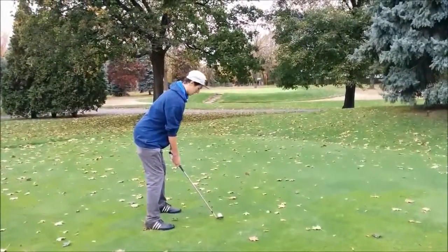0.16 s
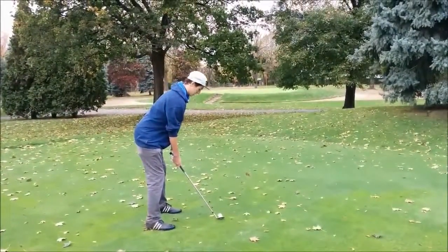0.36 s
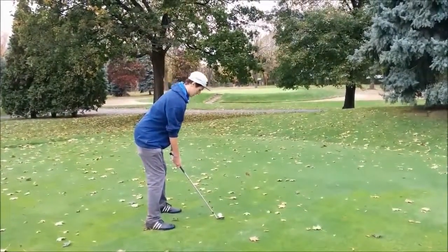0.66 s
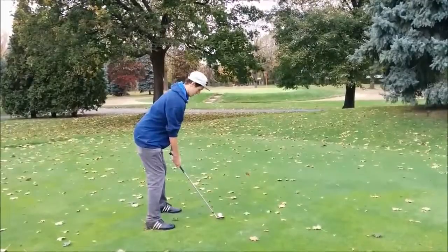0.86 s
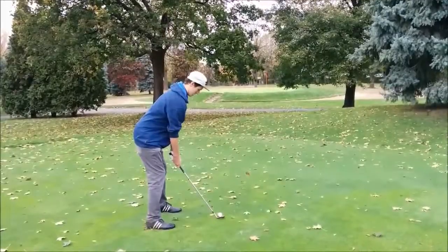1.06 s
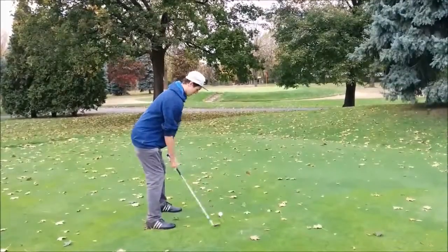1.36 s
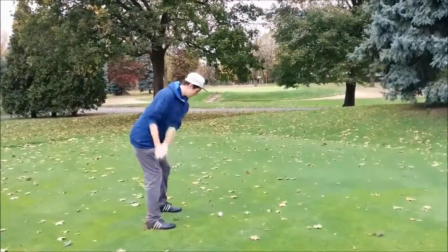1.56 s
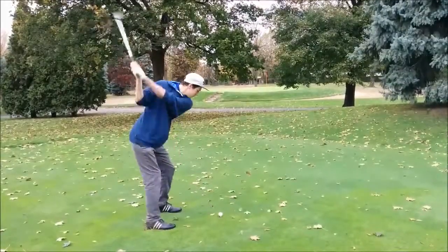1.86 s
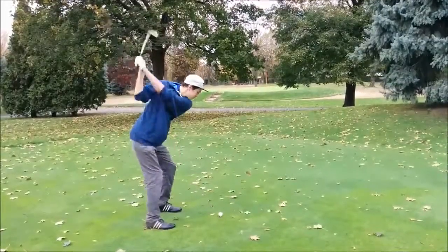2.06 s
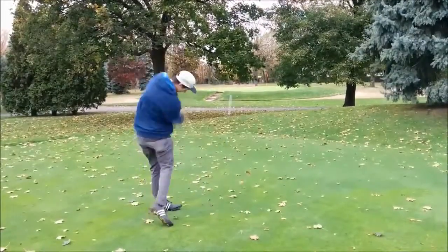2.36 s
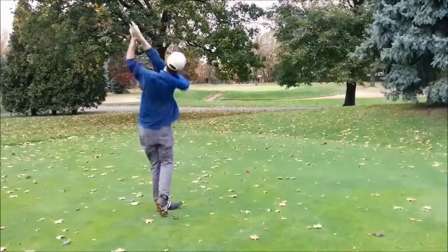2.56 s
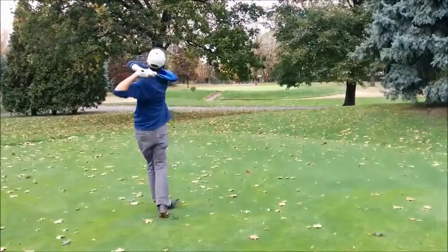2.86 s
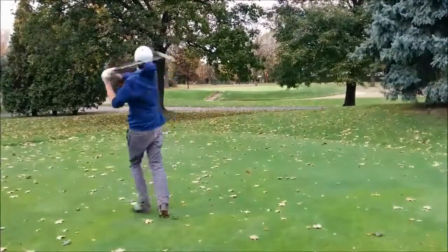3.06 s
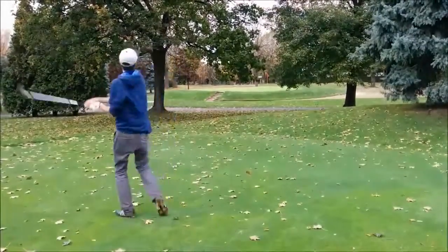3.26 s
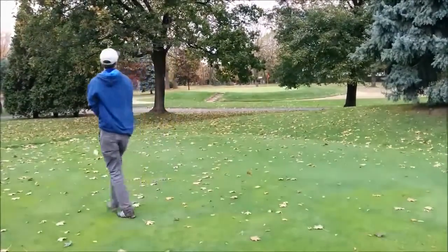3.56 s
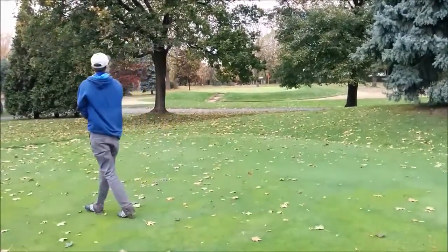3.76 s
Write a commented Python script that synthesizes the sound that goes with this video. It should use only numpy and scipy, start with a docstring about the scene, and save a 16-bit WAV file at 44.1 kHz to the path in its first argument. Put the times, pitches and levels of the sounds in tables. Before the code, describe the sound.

A golf shot cracks out in gusty wind. From the start, uneven gusts rumble and thump on the microphone, with a small tick near 1.1 seconds. At about 2.6 seconds a club swishes briefly and hits the ball with a sharp, bright crack, then swishes on. Turf and leaves patter faintly until 3 seconds, a shoe scuffs lightly around 3.2 seconds, and the gusts ease towards 4 seconds.

```python
"""Iron shot in gusty wind

A golfer plays off leaf-strewn grass a few metres from a phone. The club's turbulent wake swishes, and
the impact cracks and rings the modes of ball and club head. The club swishes on, leaves and turf patter
back and a shoe scuffs. Throughout, gusts rumble on the microphone port and single eddies thump it."""
import sys
import numpy as np
from scipy import signal
from scipy.fft import rfft, irfft
from scipy.io import wavfile
from scipy.ndimage import uniform_filter1d

SR = 44100
rng = np.random.default_rng(int(sys.argv[2]) if len(sys.argv) > 2 else 0)


def dump(signal):
    """Clip the signal to [-1, 1] and save it as 16-bit WAV at the path in sys.argv[1]."""
    limited = np.clip(np.atleast_2d(signal).T, -1, 1)
    pcm = np.round(limited * 32767).astype(np.int16)
    wavfile.write(sys.argv[1], SR, pcm)


N = 171990


def undb(db):
    """Amplitude ratio of a level in decibels."""
    return np.exp(np.asarray(db) * np.log(10) / 20)


def unit(x):
    """Normalisation to rms 1."""
    return x / np.sqrt(np.mean(x ** 2))


def clock(size):
    """Sample times in seconds."""
    return np.arange(size) / SR


def add(out, start_s, sound):
    """Superposition: a short sound sums into the mix."""
    i = int(round(start_s * SR))
    lo, hi = max(i, 0), min(i + len(sound), N)
    if hi > lo:
        out[lo:hi] += sound[lo - i:hi - i]


def noise(spectrum, size=N):
    """Spectral shaping: white noise filtered to a density curve, at rms 1."""
    hz, db = np.array(spectrum, float).T
    bins_hz = np.maximum(np.fft.rfftfreq(size, 1 / SR), 1)
    gain = undb(np.interp(np.log(bins_hz), np.log(hz), db))
    return unit(irfft(rfft(rng.standard_normal(size)) * gain, size))


def smooth(x, width):
    """Low-pass filtering by two moving averages."""
    return uniform_filter1d(uniform_filter1d(x, width), width)


def wander(rate_hz):
    """Random modulation: smoothed noise of rms 1."""
    return unit(smooth(rng.standard_normal(N), max(int(SR / rate_hz), 2)))


def steady(x, window_s):
    """Division by the running rms evens out slow swells."""
    return x / np.sqrt(smooth(x ** 2, int(window_s * SR)) + 1e-9)


def decay(age, t60_s, hold_s=0):
    """Exponential damping: after the hold, 60 dB is lost every t60_s."""
    return np.exp(-np.log(1000) * np.maximum(age - hold_s, 0) / t60_s)


def bursts(rows, spectrum, rise_s, t60_s):
    """Noise transients: a fast rise, then exponential decay."""
    out, age = np.zeros(N), clock(4096)
    attack = np.sin(np.pi / 2 * np.minimum(age / rise_s, 1)) ** 2
    envelope = attack * decay(age, t60_s, hold_s=rise_s)
    for start_s, level_db in rows:
        add(out, start_s, undb(level_db) * steady(noise(spectrum, len(age)), .002) * envelope)
    return out


# Distant outdoor air: frequency_hz, density_db
AIR_SPECTRUM = [(40, -6), (160, 6), (550, -14), (850, -6), (2000, -28), (4500, -38), (16000, -43)]
def outdoor_air(level_db=-55.5, drift_db=1.2):
    """Ambient noise floor: a low wash that drifts in level."""
    return undb(level_db) * noise(AIR_SPECTRUM) * undb(drift_db * wander(8))


# Gusts at the microphone port: start_s, length_s, level_db
PORT_GUSTS = [(.025, .095, -29), (.125, .125, -24), (.32, .04, -27), (.408, .055, -16), (.47, .06, -29),
              (.535, .032, -16), (.64, .07, -27), (.775, .05, -36), (.918, .04, -22), (.96, .115, -17),
              (1.132, .033, -21), (1.247, .025, -25), (1.305, .11, -20), (1.42, .042, -17),
              (1.55, .18, -32), (1.632, .025, -23), (1.745, .145, -21), (1.895, .09, -18), (2., .09, -26),
              (2.095, .062, -21), (2.318, .025, -30), (2.392, .07, -28), (2.492, .11, -22),
              (2.61, .08, -28), (2.695, .145, -20), (2.85, .15, -29), (3.147, .15, -22), (3.305, .195, -20),
              (3.615, .04, -23), (3.782, .035, -29), (3.882, .03, -28)]
def gust_pressure(attack_s=.008, release_s=.016):
    """Incoherent addition: gusts swell, hold and die, summing in power to one pressure envelope."""
    power, age = np.zeros(N), clock(16384)
    for start_s, length_s, level_db in PORT_GUSTS:
        envelope = np.minimum(age / attack_s, 1) * np.exp(-np.maximum(age - length_s, 0) / release_s)
        add(power, start_s - attack_s / 2, (undb(level_db) * envelope) ** 2)
    return np.sqrt(power)


# Low rumble, upper rumble and hiss of the wind: frequency_hz, density_db
LOW_RUMBLE = [(30, -40), (58, 0), (160, 0), (280, -7), (450, -24), (4000, -105)]
UPPER_RUMBLE = [(120, -16), (260, 0), (400, -4), (680, -21), (1150, -32), (4000, -95)]
WIND_HISS = [(1000, 5), (1500, 1), (1900, -7), (3800, -10), (4600, -22), (7500, -15), (16000, -31)]
def wind_noise(gust, flutter_hz=45):
    """Turbulent pressure: a fluttering rumble brightens with gust strength over a faint, slower hiss."""
    strength = gust / undb(-20)
    low = undb(-1) * gust * steady(noise(LOW_RUMBLE), .03)
    upper = undb(-28) * strength ** 1.3 * noise(UPPER_RUMBLE)
    upper *= unit(undb(3 * wander(flutter_hz)))
    swell = uniform_filter1d(strength, int(.05 * SR))
    hiss = undb(-55.5) * swell ** .62 * noise(WIND_HISS)
    flutter = unit(undb(3.6 * wander(flutter_hz)))
    return (low + upper) * flutter + hiss


def pulse(u):
    """A smooth pressure pulse, u in half widths."""
    return (1 + u ** 2 / 3 + u ** 4 / 22) ** -2.75


# Single eddies hitting the port: time_s, level_db, half_width_ms
PORT_EDDIES = [(.1289, -2, .65), (.1795, 1, .56), (.2344, -9, .8), (.4214, -2, .72), (.4298, -4, 1.2),
               (.4455, -5, .9), (.4668, .8, .6), (.4111, -8, .8), (.5377, -7, 1.1), (.5435, -4, .62),
               (.556, -3, .55), (.5623, -6, .6), (.6577, -9, .6), (.6964, -13, .65), (.9605, -9, .55),
               (.9793, -3, 1.2), (1.0073, -5, .7), (1.0602, -7, 1.1), (1.1393, -7, .65), (1.3334, -8, 1.2),
               (1.4487, -3, .75), (1.4621, -.3, .55), (1.8017, -5, .68), (1.8899, -9, .7),
               (1.9035, -1.5, .75), (1.9405, -8, .9), (1.9529, -4, .7), (1.9646, -1.5, .58),
               (1.98, -7, 1.1), (2.3271, -5, .62), (2.5546, -2, .6), (2.7906, -6, .65), (2.8341, -8, .9),
               (2.9061, -4, .75), (2.9543, -3.5, .7), (3.152, -9, .6), (3.2349, -11, .75),
               (3.3117, -7, 1.1), (3.3218, -2, 1.), (3.4928, -7, 1.1), (3.6235, -7, .7), (3.635, -9, .7)]
def eddies(gust, sputter_per_s=60, lead_s=.01):
    """Vortex pressure: each passing eddy pushes slightly, sucks at the port, then rebounds."""
    rows = [(time_s, undb(db), width_ms) for time_s, db, width_ms in PORT_EDDIES]
    # Small eddies sputter through the gusts, narrower in strong wind.
    for k, (jitter, loud, wide) in enumerate(rng.standard_normal((N // 200, 3))):
        time_s = (k + jitter / 2) / sputter_per_s
        if 0 < time_s < (N - 1) / SR:
            pressure = gust[int(time_s * SR)] + 1e-6
            width_ms = 1.05 * (pressure / undb(-20)) ** -.25 * np.exp(.3 * wide)
            rows.append((time_s, pressure * undb(3 + 3 * loud), width_ms))
    out, offset_ms = np.zeros(N), 1000 * (clock(1024) - lead_s)
    for time_s, amplitude, width_ms in rows:
        u = offset_ms / width_ms
        thump = .18 * pulse(u + 2.1) - pulse(u) + .42 * pulse(u - 2.1)
        add(out, time_s - lead_s, amplitude * thump)
    return out


# Hard eddies breaking: start_s, level_db
EDDY_SNAPS = [(.229, -18), (.418, -19), (.554, -24), (1.638, -28), (1.754, -18), (1.927, -24), (2.786, -30),
              (3.149, -27)]
# Their spectrum: frequency_hz, density_db
SNAP_SPECTRUM = [(820, 0), (1300, -14), (2000, -36), (16000, -90)]
def eddy_snaps():
    """Vortex breakdown: hard eddies snap in dull bursts."""
    return bursts(EDDY_SNAPS, SNAP_SPECTRUM, rise_s=.002, t60_s=.04)


# A sharp tick: frequency_hz, density_db
TICK_SPECTRUM = [(2000, -22), (4900, 0), (10000, -3), (16000, -13)]
def tick(start_s=1.0674, level_db=-24.5):
    """A broadband transient, heard as one bright tick."""
    return bursts([(start_s, level_db)], TICK_SPECTRUM, rise_s=.0002, t60_s=.008)


def dropout(x, start_s=1.3229, length_s=.006, fade_s=.002, click_db=-24):
    """Gating: the sound cuts out for an instant, with a dry click at the leading edge."""
    t = clock(N) - start_s
    click = undb(click_db) * np.exp(-np.abs(t) / .001) * (t < 0)
    gate = np.clip(np.maximum(-t, t - length_s) / fade_s, 0, 1)
    return x * np.sin(np.pi / 2 * gate) ** 2 + click


# Downswing (also the trees' echo) and follow-through: frequency_hz, density_db
SWISH_SPECTRUM = [(400, -20), (900, 0), (2400, -2), (3400, -15), (5700, -15), (7000, -29), (16000, -42)]
TURF_SPECTRUM = [(500, -20), (1000, -4), (1800, 0), (3600, -10), (4800, -5), (6000, -21), (16000, -48)]
def swish(spectrum, peak_s, level_db, rise_s, fall_s):
    """Flow noise: the rush of air and grass past the club swells and falls."""
    out, t = np.zeros(N), clock(32768)
    middle = t[-1] / 2
    u = (t - middle) / np.where(t < middle, rise_s, fall_s)
    envelope = np.exp(2 - 2 * np.sqrt(1 + u ** 2))
    add(out, peak_s - middle, undb(level_db) * envelope * noise(spectrum, len(t)))
    return out


# Modes of ball and club head: pitch_hz, level_db, t60_s
IMPACT_MODES = [(945, -11, .021), (1215, -9, .022), (1640, -17, .013), (1950, -12, .012), (2326, -15, .016),
                (2650, -16, .016), (5700, -12, .01), (6050, -15, .009), (7834, -21, .016),
                (9150, -25, .016)]
# Contact crack and grass spray: frequency_hz, density_db
CRACK_SPECTRUM = [(600, -15), (1000, 0), (2400, -1), (5000, -15), (5800, 2), (7000, -15), (9000, -14),
                  (16000, -29)]
SPRAY_SPECTRUM = [(1000, 0), (10000, -11), (16000, -18)]
def strike(start_s=2.6236, zing_hz=3980, zing_hz_per_s=30000):
    """Impact excitation: a crack rings damped modes; grass sprays and the trees echo faintly."""
    out, age = np.zeros(N), clock(32768)
    modes = sum((-1) ** k * undb(db) * decay(age, t60_s) * np.sin(2 * np.pi * hz * age)
                for k, (hz, db, t60_s) in enumerate(IMPACT_MODES))
    crack = undb(-10) * steady(noise(CRACK_SPECTRUM, len(age)), .002)
    crack *= decay(age, t60_s=.014, hold_s=.0014)
    spray = undb(-42) * noise(SPRAY_SPECTRUM, len(age)) * decay(age, t60_s=.24)
    echo = undb(-50) * noise(SWISH_SPECTRUM, len(age)) * decay(age, t60_s=.9)
    # A brief rising zing peaks 7 ms after contact.
    lag = age - .007
    chirp = np.sin(2 * np.pi * (zing_hz + zing_hz_per_s * lag / 2) * lag)
    zing = undb(-19.5) * np.exp(-(lag / .0032) ** 2) * chirp
    add(out, start_s, modes + crack + zing + spray + echo)
    return out


# Leaves and turf landing: start_s, level_db
TURF_CLUMPS = [(2.688, -39), (2.798, -44), (2.848, -45), (2.953, -46), (2.98, -52), (3.015, -57)]
# Shoe scuffs: start_s, level_db, length_s, brightest_hz
SHOE_SCUFFS = [(3.218, -39, .014, 6400), (3.258, -34, .009, 4100), (3.362, -52, .014, 3900)]
# Dry leaves and grass: ratio_to_brightest, density_db
LEAF_SPECTRUM = [(.15, -11), (.7, -4), (1.03, 1), (1.28, -16), (4, -38)]
def rustles(clump_s=.011, clump_hz=3800, grain_db=3.2):
    """Impact and friction noise: clumps patter down over a thinning crackle; a shoe scuffs the grass."""
    out, age = np.zeros(N), clock(32768)
    clumps = [(start_s, level_db, clump_s, clump_hz) for start_s, level_db in TURF_CLUMPS]
    crackle = (2.76, -53, .1, 3900)  # columns as for the scuffs
    for start_s, level_db, length_s, brightest_hz in clumps + [crackle] + SHOE_SCUFFS:
        u = 2 * age / length_s
        spectrum = [(brightest_hz * ratio, db) for ratio, db in LEAF_SPECTRUM]
        add(out, start_s, undb(level_db) * u * np.exp(1 - u) * noise(spectrum, len(age)))
    return out * unit(undb(grain_db * wander(250)))


def scene():
    """Superposition of wind, shot and outdoor air in one channel."""
    gust = gust_pressure()
    buffeting = wind_noise(gust) + eddies(gust) + eddy_snaps()
    downswing = swish(SWISH_SPECTRUM, peak_s=2.6, level_db=-34, rise_s=.022, fall_s=.022)
    impact = strike()
    follow_through = swish(TURF_SPECTRUM, peak_s=2.715, level_db=-35, rise_s=.026, fall_s=.032)
    shot = downswing + impact + follow_through + rustles()
    return (buffeting + shot + outdoor_air() + tick())[None]


def record(dry, bass_hz=45, top_hz=16100, ceiling=.87):
    """Band limiting and saturation: the phone sheds bass, drops out, rounds thumps and cuts the top."""
    high_pass = signal.butter(3, bass_hz, "high", fs=SR, output="sos")
    low_pass = signal.ellip(8, .2, 70, top_hz, fs=SR, output="sos")
    x = dropout(signal.sosfilt(high_pass, dry))
    rounded = x / (1 + (x / ceiling) ** 16) ** (1 / 16)
    return signal.sosfilt(low_pass, rounded)


dry = scene()
out = record(dry)
dump(out)
```